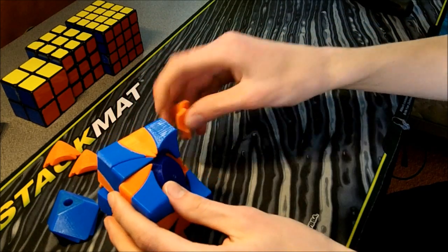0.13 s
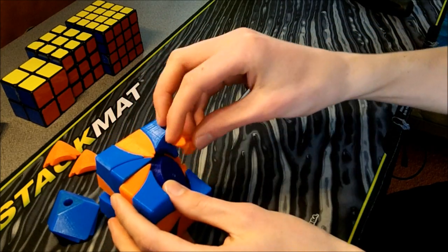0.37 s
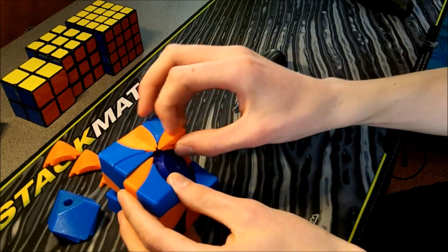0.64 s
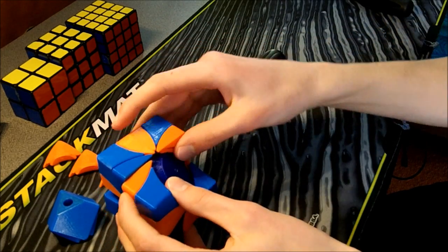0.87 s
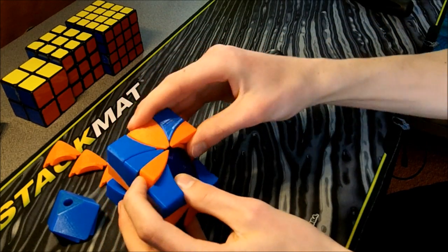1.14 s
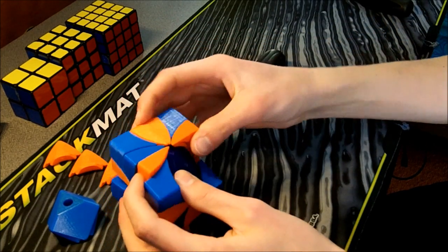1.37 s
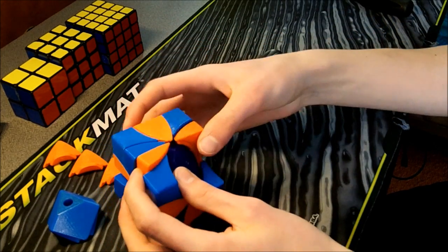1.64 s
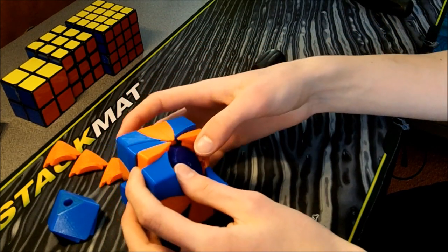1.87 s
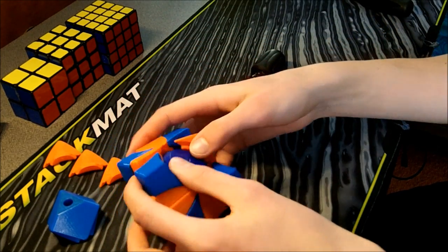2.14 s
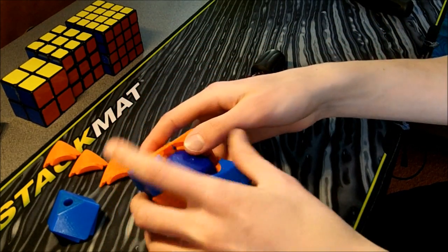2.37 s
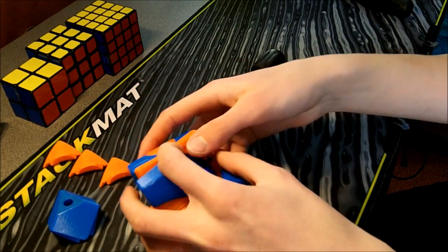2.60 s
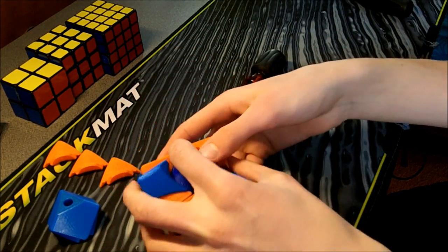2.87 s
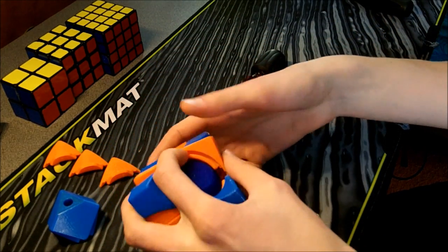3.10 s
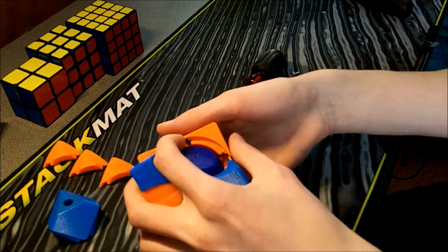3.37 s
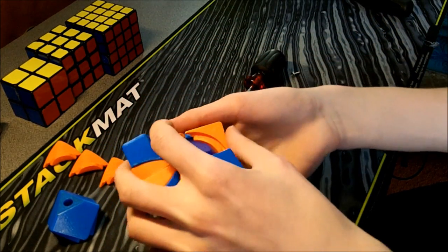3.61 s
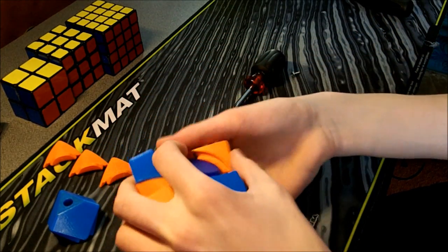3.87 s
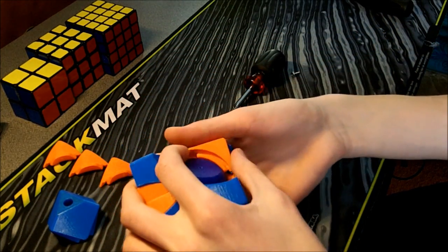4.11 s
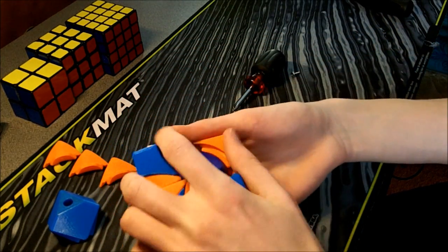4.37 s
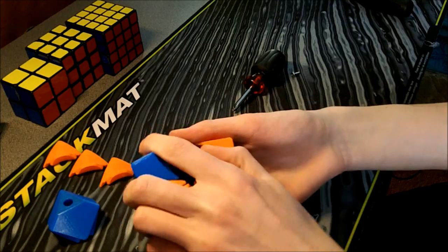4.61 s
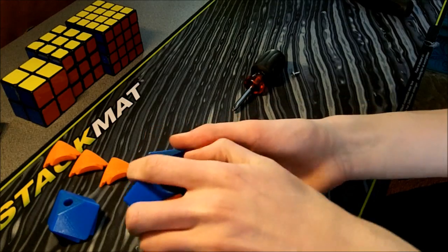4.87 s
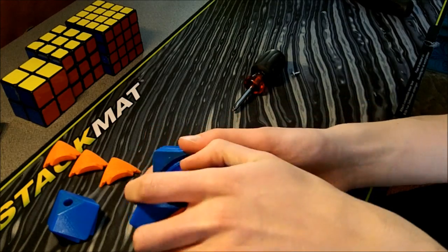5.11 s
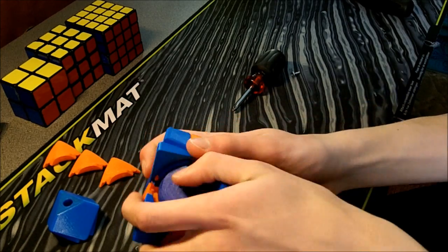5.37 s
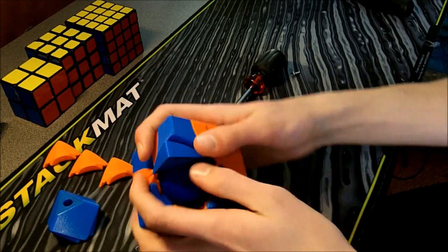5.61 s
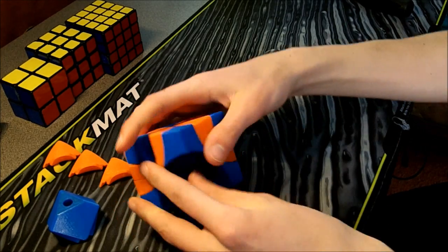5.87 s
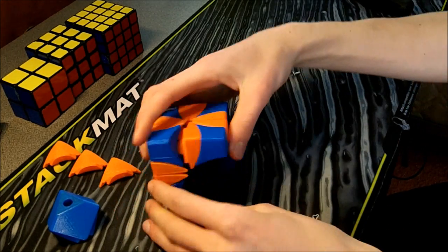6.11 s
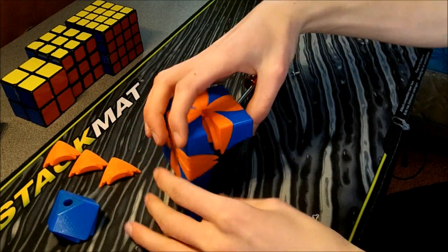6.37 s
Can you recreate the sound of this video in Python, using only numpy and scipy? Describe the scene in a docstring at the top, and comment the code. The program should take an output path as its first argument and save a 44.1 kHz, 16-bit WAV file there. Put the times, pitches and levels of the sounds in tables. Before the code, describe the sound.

A hollow plastic twisty puzzle is handled close to the microphone in a small, quiet room with faint steady hiss. A light click comes at 0.1 s and soft ticks at 0.3, then hard bright snaps at 0.45-0.65 and a very strong clack at 0.9-1.05 with a faint dull knock. Tiny ticks follow, a clear snap at 1.5, then loose rattling and short gritty scrapes until 2.0. A busy clicking burst falls at 2.2-2.4, duller small ticks at 2.5-2.85, then near quiet. A sharp snap breaks in at 3.4, another pair at 3.87, and a loud one at 4.55. From 4.6 to 5.7 faces rub and tick more softly. Crisp clicks return at 5.75-5.9, a pause, then a dry hard snap at 6.2 and a double clack at 6.4 with a low tabletop thud. Every hit is short, mid-high and thin, with little bass and a very brief room tail.

```python
"""Hollow plastic puzzle pieces click and snap under the hands: bursts of hard contacts ring the thin shells.
Between clicks, faces scrape in dense stick-slip ticks, loose pieces tick and free ones ring on paired modes.
Some knocks boom in the puzzle body and table top on clusters of low modes.
A small room answers with two noise slaps and a short tail, over air and hiss made of one steady shaped noise."""
import sys
import numpy as np
from scipy import signal
from scipy.fft import rfft, irfft
from scipy.io import wavfile
from scipy.ndimage import uniform_filter1d

SR = 44100
rng = np.random.default_rng(int(sys.argv[2]) if len(sys.argv) > 2 else 0)


def store_wav(level_fs):
    """Save 16-bit WAV to argv[1]."""
    pcm = np.round(np.clip(np.atleast_2d(level_fs), -1, 1) * 32767)
    wavfile.write(sys.argv[1], SR, pcm.T.astype(np.int16))


def how_loud(loudness_db):
    """Turn decibels into a plain amplitude multiplier (0 dB gives 1, 20 dB gives 10)."""
    steps = np.asarray(loudness_db, float) / 20
    return 10 ** steps


N = 286076

# spectrum of air and hiss, relative: pitch_hz, density_db
AIR_SPECTRUM = [(18, 1), (30, 1), (130, 0), (300, -2), (700, -4), (1500, -7.5), (3500, -8.5), (6500, -14.5),
                (9000, -16), (15000, -14.5)]
AIR_RMS_DB = -55.5

# faces sliding over each other, before the shells colour them: start_s, length_ms, level_db, pitch_hz
SCRAPES = [(0, 17, -57.5, 3300), (.255, 40, -60, 2520), (.315, 23, -36, 2200), (.458, 18, -45.5, 3560),
           (.519, 88, -48, 3300), (0.611, 33, -43, 3030), (.905, 78, -59, 3180), (1.019, 18, -44, 3100),
           (1.066, 80, -48.5, 3240), (1.35, 29, -46, 2830), (1.436, 140, -48.5, 2560),
           (1.625, 37, -44, 2780), (1.748, 52, -50, 2660), (1.812, 25, -50, 3100), (1.872, 24, -56, 2400),
           (1.925, 38, -53.5, 2360), (2.219, 21, -47, 3000), (2.3, 88, -48.5, 2800), (2.538, 64, -69, 2410),
           (2.755, 100, -51.5, 2300), (3.18, 83, -52, 3560), (3.314, 180, -54.5, 2580),
           (3.389, 41, -48, 2324), (3.885, 21, -42.5, 2900), (4.251, 71, -54, 2900), (4.403, 66, -57, 2815),
           (4.566, 51, -47, 3160), (4.642, 72, -48.5, 3000), (4.735, 133, -52.5, 2650),
           (4.936, 21, -44.5, 3300), (5.013, 79, -47.5, 3000), (5.091, 55, -53, 3040),
           (5.173, 33, -48.5, 3160), (5.268, 57, -43, 2730), (5.49, 170, -49, 3200), (5.684, 25, -48, 3000),
           (5.75, 37, -49.5, 2830), (5.97, 115, -57, 3300), (6.22, 52, -52, 3400), (6.289, 85, -53, 3300)]

# loose pieces tick at random while faces slide
TICKS_PER_S, TICK_OVER_SCRAPE_DB, TICK_SCATTER_DB = 22, 11.5, 4
TICK_SWELL_MS, TICK_FADE_MS, TICK_PITCH_SPREAD = 1.7, 2.03, 0.16

# clicks, before the shells colour them: start_s, level_db, pitch_hz, swell_ms, fade_ms (to a third)
CLICK_EVENTS = [(0.0788, -36, 3500, 2, 4.3), (0.0834, -22.5, 3600, 0.36, 1.1),
                (0.3105, -25.5, 2860, 0.12, 3.6), (.3173, -30, 2460, 1.2, 1.6),
                (.3786, -34.5, 3470, 0.39, 1.8), (.4393, -40, 1580, 1, 5.9),
                (0.4497, -13.5, 3560, 0.29, 2.7), (0.4987, -17.5, 3380, 0.81, 4.1),
                (0.5069, -9, 3800, 6, 4.1), (0.5465, -28, 3730, 7.3, 1.8), (0.6134, -23.5, 3220, 4, 2.5),
                (0.6215, -23, 2910, 0.79, 4.7), (0.6295, -13, 3400, 4.9, 1.1),
                (0.7602, -32, 3000, 0.91, 3.6), (.894, -17.5, 3860, .6, 1.5),
                (0.9064, -22.5, 2900, 1.3, 5.6), (0.928, -22.5, 3620, 0.21, 4.1),
                (.995, -39, 2620, .6, 2.2), (1.003, -17, 2840, 1.35, 1.3), (1.0517, -5.5, 3820, 5.53, 2.1),
                (1.1352, -29, 2600, 0.63, 2.5), (1.164, -36.5, 3080, .5, 3), (1.193, -42, 2420, 1.6, 6),
                (1.2192, -41, 2760, .9, 2.4), (1.234, -29, 2850, 0.11, 0.89),
                (1.268, -43.5, 2210, 2.6, 2.5), (1.326, -44.5, 2530, 1.7, 5.5),
                (1.36, -33, 2820, 0.93, 2.9), (1.3702, -28, 2880, .5, 5.4),
                (1.451, -27.5, 2670, 0.23, 0.98), (1.496, -25, 2630, 1.4, 5.9),
                (1.5105, -15, 3650, .8, 1.35), (1.5193, -28, 2530, 0.39, 11), (1.5366, -23.5, 3300, 3, 3.6),
                (1.6339, -31, 2890, 4.2, 4.1), (1.6525, -29, 2470, 7.5, 1.97),
                (1.713, -31.5, 3270, 0.35, 1.8), (1.7392, -20.5, 3100, 2.5, 5.1),
                (1.7731, -29, 3130, .35, 4.3), (1.8118, -27, 2450, .6, 11.4),
                (1.835, -23.5, 3040, 2.5, 6.5), (1.8499, -29.5, 3140, 1.3, 2.8),
                (1.8799, -28, 2290, 3.1, 5.1), (1.9482, -30, 2270, 1.3, 2.1),
                (2.0053, -27, 3000, 0.54, 6.4), (2.1462, -35, 2900, 6.5, 3.4),
                (2.2059, -19.5, 2900, 5, 3.3), (2.2829, -20, 3000, 3.2, 2.9),
                (2.2925, -14.5, 2930, 0.74, 2.9), (2.3398, -26.5, 2770, 0.34, 3),
                (2.3568, -32, 3410, 2.3, 4.3), (2.3708, -21.5, 2830, .6, 0.92),
                (2.387, -31.5, 2720, 0.84, 1.6), (2.5129, -30.5, 2500, 2, 4.7),
                (2.545, -32, 2240, 1.7, 0.64), (2.5546, -34, 2910, 0.57, 4.3),
                (2.5663, -32, 2170, 0.55, 4.2), (2.595, -30.5, 2500, .6, 4), (2.6016, -28, 2650, 7, 4),
                (2.768, -38, 1800, 1.1, 3.4), (2.7838, -32, 2360, 1.5, 1.4), (2.7939, -26, 2615, 0.91, 2.6),
                (2.8004, -26.5, 2145, 3.9, 7), (2.8157, -23.5, 2490, 0.55, 4.3),
                (2.8264, -27.5, 2320, 2.3, 2.4), (2.9718, -44, 1840, 0.75, 1.8),
                (3.211, -35.5, 4105, 0.7, 7.5), (3.2428, -34.5, 2267, 5.5, 3.9), (3.37, -37, 2980, 0.75, 3),
                (3.3813, -15.5, 3620, 4, 5.2), (3.407, -34, 2200, .9, 5.2), (3.422, -48, 2110, 2.8, 8.9),
                (3.7773, -37.5, 3430, 2.2, 3.4), (3.8575, -29, 3810, 1.4, 21), (3.8704, -16, 2900, 1.15, 2),
                (3.875, -11.5, 3600, .5, 2.6), (3.9974, -25, 2480, 2.5, 2.9), (4.142, -39, 2400, 0.35, .5),
                (4.184, -42.5, 2010, 2.8, 5.6), (4.2524, -38.5, 2670, 0.59, 8.1),
                (4.2883, -33, 3180, 1.2, 4.8), (4.3055, -35.5, 2490, 3.7, 2.2),
                (4.4131, -35, 2770, .3, 1.1), (4.416, -22, 2820, 1.1, 3.5), (4.478, -30.5, 3180, 0.39, 2.2),
                (4.521, -42, 1490, 0.86, 1), (4.5495, -10.5, 3880, 2, 9), (4.6727, -30.5, 2720, 0.38, 14),
                (4.681, -24, 3570, .2, 1.2), (4.7427, -36, 3630, 1, 4.4), (4.8485, -32.5, 2960, 4.8, 3.2),
                (4.9355, -35, 1800, 0.26, 2.9), (4.943, -36.5, 4060, 2.4, 3), (5.0102, -36, 1710, 1.3, 21),
                (5.0822, -24, 3700, .35, 0.35), (5.1507, -39, 2695, 4.9, 1.4),
                (5.1742, -33.5, 3530, 1, 6.7), (5.263, -28, 3050, 5.8, 2.7),
                (5.39, -36.5, 3910, 0.52, 2.18), (5.4135, -35.5, 2780, 1.4, 2.3),
                (5.4897, -37, 1910, .3, 3.6), (5.644, -34, 2773, 2.4, 2.4), (5.6838, -30.5, 3270, 5.6, 2.4),
                (5.7407, -22, 3080, 0.12, 1), (5.7448, -24, 3200, 0.12, 3.9),
                (5.7782, -46, 3900, 2.15, 0.75), (5.8063, -20, 3330, 0.38, 2.2),
                (5.8768, -19, 3300, .4, 1.6), (5.901, -20.5, 3300, 0.62, 1.6),
                (6.0396, -34, 3860, 0.22, 5.5), (6.2002, -22.5, 3300, .24, 0.66),
                (6.2186, -11.5, 3640, 0.11, 0.13), (6.2585, -36, 3120, 1.2, 1.6),
                (6.2934, -35, 3390, 4.7, 5.3), (6.3964, -18.5, 3820, 0.22, 2.9),
                (6.406, -19, 3780, 1.46, 3.6)]
# breadth of the ring as bandwidth / pitch: a sudden touch rings narrow, a drawn-out rattle
# broadens, small bright pieces ring narrower
BREADTH, BROADEN_PER_MS, NARROW_PER_KHZ = 0.76, 0.019, 0.12

# blows on a loosely held piece, and one faint reply from a nearby surface about 14 ms after the blow at 6.219
# s, before the shells colour them: start_s, level_db, pitch_hz
PING_EVENTS = [(.084, -26, 3470), (.4502, -11.5, 3750), (.512, -12.5, 4120), (2.609, -28.5, 2200),
               (2.756, -39, 1590), (3.247, -34, 2100), (3.392, -20, 2140), (3.424, -31, 2130),
               (3.875, -16, 3810), (4.6815, -24.5, 3650), (6.2003, -24, 3300), (6.219, -14.5, 3300),
               (6.2335, -34, 3470), (6.396, -28, 3550), (6.408, -29, 2150)]
PING_T60_S, PING_PAIR_RATIO = 0.016, 1.14

# modes of the hollow pieces, levels relative to each other: pitch_hz, level_db, t60_s
SHELL_MODES = [(1256, -30, 0.036), (1930, 8, 0.047), (2200, 21.5, 0.0027), (2900, 14.5, 0.0045),
               (3300, 1.5, 0.0058), (4030, -5, 0.016), (4500, 18.5, 0.0045), (4930, 10, 0.0048),
               (6900, -5, 0.015)]
# how well small pieces radiate to the microphone: pitch_hz, gain_db
SMALL_PIECE_RADIATION = [(150, -22), (500, -12), (1000, 0), (2000, 0.5), (5000, 0.5), (7000, -8.5),
                         (9000, -18), (11300, -7.5), (12300, -44)]

# energy of each reply from a nearby surface against the direct sound: delay_ms, level_db
ROOM_SLAPS = [(13.3, -24.5), (41, -26)]
# decay of the room tail by pitch: pitch_hz, t60_s
ROOM_DECAY = [(500, 0.42), (1500, 0.19), (3500, 0.1), (9000, 0.05)]
TAIL_ENERGY_DB = -11.5

# knocks passing into the puzzle body and the table: start_s, level_db, pitch_hz, t60_s
THUD_EVENTS = [(1.005, -38, 610, 0.035), (1.055, -38, 547, 0.05), (2.797, -44, 454, .04),
               (5.013, -43.5, 724, 0.11), (5.268, -41.5, 727, 0.099), (5.598, -41.5, 499, 0.042),
               (6.204, -49, 319, 0.44), (6.22, -41, 853, 0.19), (6.397, -39, 160, 0.2),
               (6.396, -39.5, 1010, 0.078)]
# cluster of modes in each knock, relative to its pitch and level: pitch_ratio, level_db
THUD_CLUSTER = [(.7, -17.5), (.8, -12.5), (.92, -17.5), (1.01, -4.5), (1.13, -12), (1.3, -6), (1.5, -12)]
THUD_DETUNE = 0.054  # random spread, as a fraction of mode pitch

# narrow gaps in the treble: pitch_hz, width_hz (half width, at 1/e of the depth), depth_db
TREBLE_GAPS = [(7896, 480, -22.5), (11250, 320, -4)]
TOP_HZ = 15600


def colour(x, points):
    """Shape the spectrum by (Hz, dB) points joined on a log axis."""
    hz, db = np.transpose(points)
    f = np.maximum(np.arange(len(x) // 2 + 1) * SR / len(x), 1)
    gain = how_loud(np.interp(np.log(f), np.log(hz), db))
    return irfft(rfft(x) * gain, len(x))


def unit(x):
    """Scale to rms 1."""
    return x / np.sqrt(np.mean(x ** 2))


def add(out, start_s, x):
    """Mix x into out from its start time."""
    i = int(start_s * SR)
    out[i:i + len(x)] += x[:len(out) - i]


def ring(hz, db, t60, phase, seconds):
    """Sum of sine modes, each decaying exponentially by 60 dB in its t60."""
    t = np.arange(int(seconds * SR))[:, None] / SR
    modes = how_loud(db - 60 * t / t60) * np.sin(2 * np.pi * hz * t + phase)
    return modes.sum(axis=1)


def air():
    """Room air and microphone hiss form one steady noise with a falling spectrum."""
    return how_loud(AIR_RMS_DB) * unit(colour(rng.standard_normal(N), AIR_SPECTRUM))


def contacts(count, rate, scatter_db):
    """Random hard touches of uneven force and either sign, rate per second over count samples."""
    when = rng.random(count)
    sign, force = rng.standard_normal((2, count))
    return (when < rate / SR) * np.sign(sign) * how_loud(scatter_db * force)


def dull_ring(x, centre_hz, breadth, crack_db):
    """Thick plastic damps the ring of a touch within a few cycles; the bare crack comes along."""
    b, a = signal.iirpeak(centre_hz, 1 / np.clip(breadth, .3, 1.5), SR)
    x = np.append(x, np.zeros(400))  # room for the ring to end
    return signal.lfilter(b, a, x) + how_loud(crack_db) * x


def scrape():
    """Faces slide in dense stick-slip ticks that catch at once and let go more gently."""
    out = np.zeros(N)
    t_ms = np.arange(10000) * 1000 / SR
    for start_s, length_ms, db, centre_hz in SCRAPES:
        grip = np.clip(np.minimum(t_ms / 4, (length_ms + 15 - t_ms) / 25), 0, 1)
        # the grip comes and goes every few ms
        wander = unit(uniform_filter1d(rng.standard_normal(10000), size=150))
        grip = grip * how_loud(2.37 * wander)
        touches = contacts(count=10000, rate=7000, scatter_db=4.5)
        ticks = dull_ring(touches, centre_hz, breadth=1.5, crack_db=-29)
        add(out, start_s, how_loud(db) * unit(ticks)[:10000] * grip)
    return out


def rattle(out_size, rows):
    """Hard touches strengthen up to a peak, then the bounces die away."""
    out = np.zeros(out_size)
    t_ms = np.arange(1500) * 1000 / SR
    for start_s, db, centre_hz, swell_ms, fade_ms in rows:
        swell_ms, fade_ms = max(swell_ms, .05), max(fade_ms, .1)
        swell = how_loud(-14 * (1 - t_ms / swell_ms))
        fade = how_loud(-10 * (t_ms - swell_ms) / fade_ms)
        touches = contacts(count=1500, rate=9000, scatter_db=4.5) * np.where(t_ms < swell_ms, swell, fade)
        touches[int(swell_ms * SR / 1000)] = 0.47  # one touch is certain at the peak
        breadth = BREADTH + BROADEN_PER_MS * (swell_ms + fade_ms) - NARROW_PER_KHZ * centre_hz / 1000
        # harder blows crack more brightly
        burst = dull_ring(touches, centre_hz, breadth, crack_db=-28.5 + 0.16 * db)
        loudest = np.sqrt(2 * uniform_filter1d(burst ** 2, size=52).max())
        add(out, start_s, how_loud(db) * burst / loudest)
    return out


def loose_ticks():
    """Loose pieces give small rattles at random moments of each slide, set above its level."""
    rows = []
    for start_s, length_ms, db, centre_hz in SCRAPES:
        times_s = np.cumsum(rng.exponential(size=8)) / TICKS_PER_S
        chance = rng.standard_normal((8, 2))
        for t, (z_db, z_hz) in zip(times_s, chance):
            if t < length_ms / 1000:
                tick_db = db + TICK_OVER_SCRAPE_DB + TICK_SCATTER_DB * z_db
                tick_hz = centre_hz * np.exp(TICK_PITCH_SPREAD * z_hz)
                rows.append((start_s + t, tick_db, tick_hz, TICK_SWELL_MS, TICK_FADE_MS))
    return rattle(N, rows)


def clicks():
    """Pieces snap, knock and rattle in bursts of hard contacts."""
    return rattle(N, CLICK_EVENTS)


def pings():
    """A free piece rings on a pair of quickly damped modes."""
    out = np.zeros(N)
    for start_s, db, hz in PING_EVENTS:
        pair_hz = hz * np.array([1, PING_PAIR_RATIO])
        pair_db = db - np.array([4, 6])
        add(out, start_s, ring(pair_hz, pair_db, PING_T60_S, phase=0, seconds=.06))
    return out


def shell(x):
    """The hollow pieces add their short modes; being small, they give off little bass."""
    hz, db, t60 = np.transpose(SHELL_MODES)
    modes = ring(hz, db, t60, phase=0, seconds=.03)
    modes = modes / np.sqrt(np.sum(modes ** 2))
    x = x + how_loud(-18.5) * signal.fftconvolve(x, modes)[:N]
    return colour(x, SMALL_PIECE_RADIATION)


def room_response():
    """Two slaps from nearby surfaces, with a diffuse noise tail that loses its treble first."""
    t = np.arange(int(.4 * SR)) / SR
    hz, t60 = np.transpose(ROOM_DECAY)
    tail = 0
    for k in range(len(hz)):
        # each band of noise stands out at its own pitch and fades at its own speed
        band_db = np.where(np.arange(len(hz)) == k, 0, -18)
        band = colour(rng.standard_normal(len(t)), list(zip(hz, band_db)))
        tail = tail + band * how_loud(-60 * t / t60[k])
    tail = tail * np.minimum(t / 0.0036, 1)  # soft onset
    response = how_loud(TAIL_ENERGY_DB) * tail / np.sqrt(np.sum(tail ** 2))
    for delay_ms, db in ROOM_SLAPS:
        slap = unit(rng.standard_normal(16)) / 4  # energy 1
        add(response, delay_ms / 1000, how_loud(db) * slap)
    return response


def thuds():
    """Body and table top boom on a cluster of close low modes, struck differently each time."""
    out = np.zeros(N)
    ratio, mode_db = np.transpose(THUD_CLUSTER)
    for start_s, db, hz, t60 in THUD_EVENTS:
        detune, side = rng.standard_normal((2, len(ratio)))
        mode_hz = hz * ratio * (1 + THUD_DETUNE * detune)
        phase = np.pi * (side < 0)  # each mode starts up or down at random
        add(out, start_s, ring(mode_hz, db + mode_db, t60 / ratio, phase, seconds=.4))
    return out


def scene():
    """The puzzle sounds through its shells and room; thuds, air and hiss join directly."""
    puzzle = shell(scrape() + loose_ticks() + clicks() + pings())
    reply = signal.fftconvolve(puzzle, room_response())[:N]
    return (puzzle + reply + thuds() + air())[None]


def band_limit(x):
    """A steep low-pass at the top of the band."""
    return signal.sosfilt(signal.butter(12, 16500, fs=SR, output="sos"), x)


def record(dry):
    """The treble has two narrow gaps and ends sharply above them."""
    f = np.arange(N // 2 + 1) * SR / N
    gap_db = sum(depth_db * np.exp(-np.abs((f - hz) / width_hz) ** 1.53)
                 for hz, width_hz, depth_db in TREBLE_GAPS)
    mix = irfft(rfft(dry) * how_loud(gap_db) * (f < TOP_HZ), N)
    return band_limit(mix)


dry = scene()
out = record(dry)
store_wav(out)
```